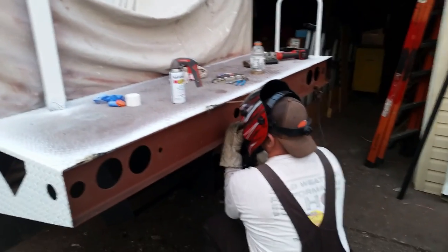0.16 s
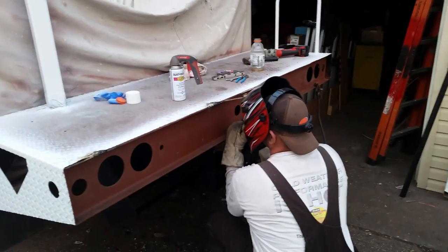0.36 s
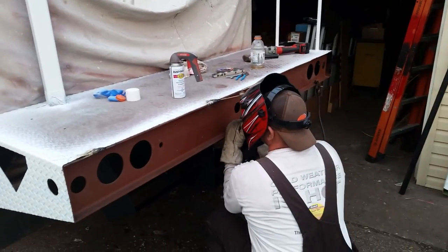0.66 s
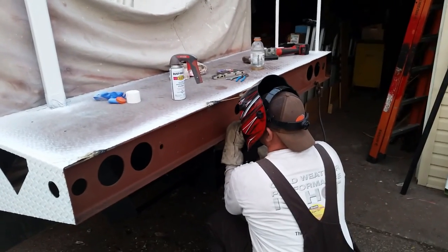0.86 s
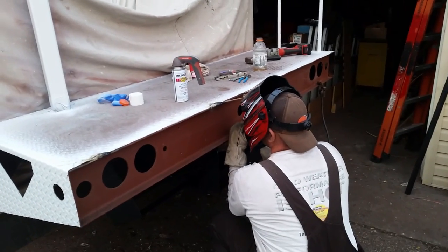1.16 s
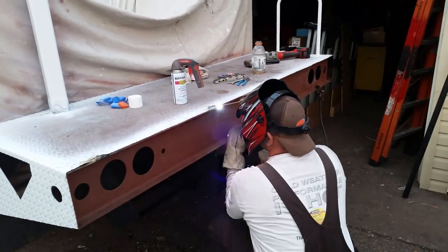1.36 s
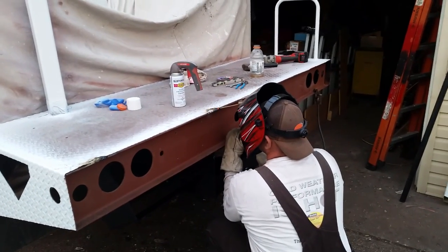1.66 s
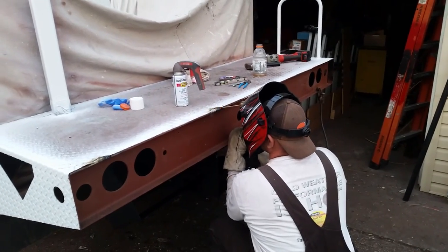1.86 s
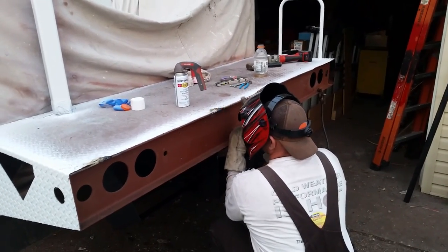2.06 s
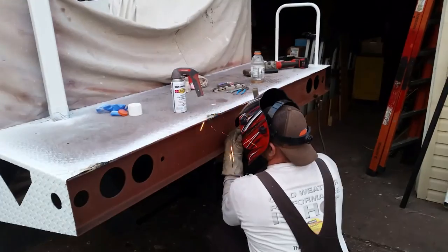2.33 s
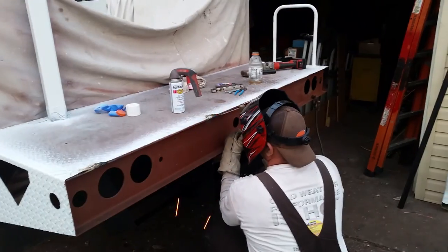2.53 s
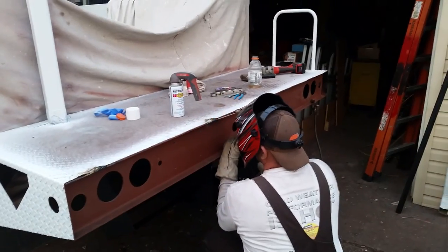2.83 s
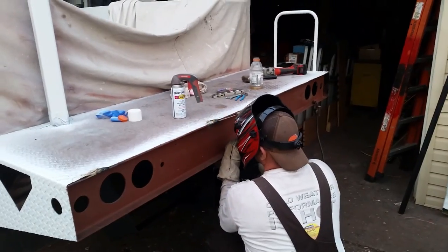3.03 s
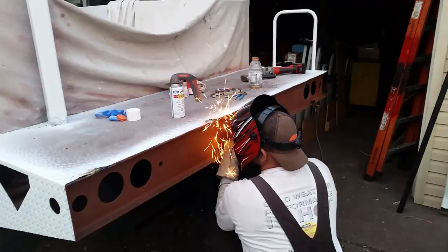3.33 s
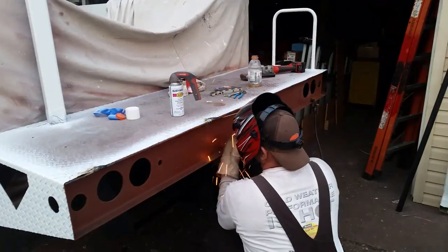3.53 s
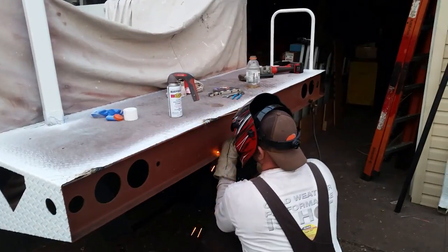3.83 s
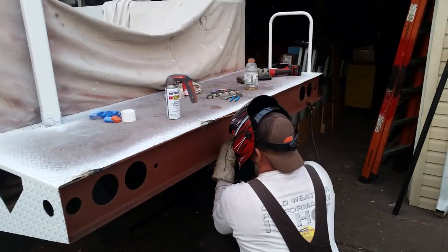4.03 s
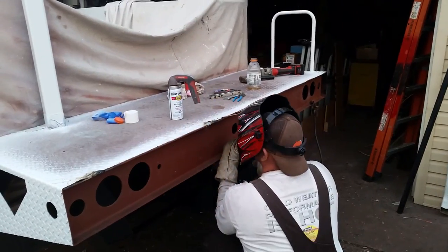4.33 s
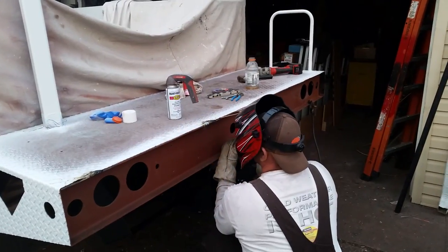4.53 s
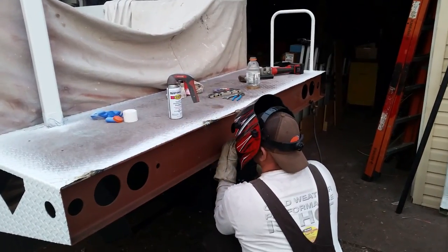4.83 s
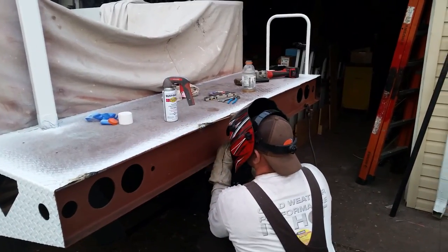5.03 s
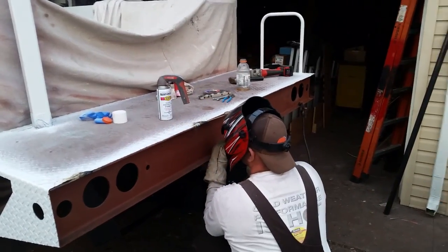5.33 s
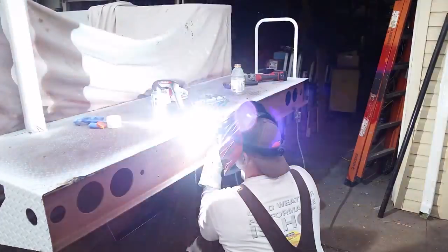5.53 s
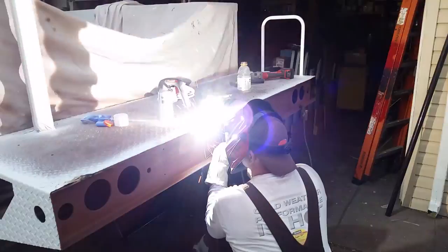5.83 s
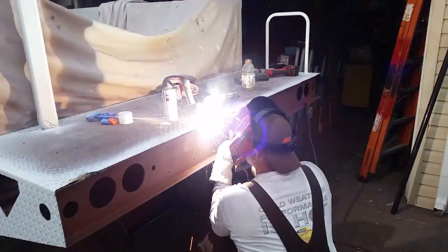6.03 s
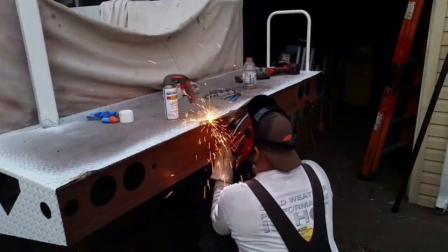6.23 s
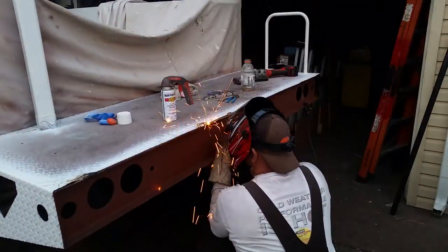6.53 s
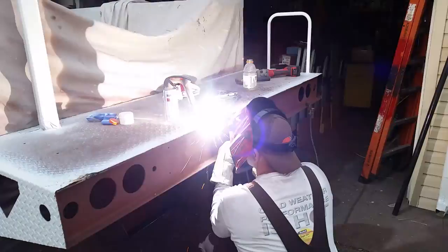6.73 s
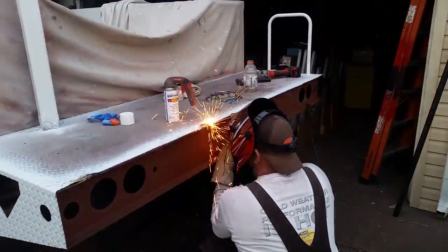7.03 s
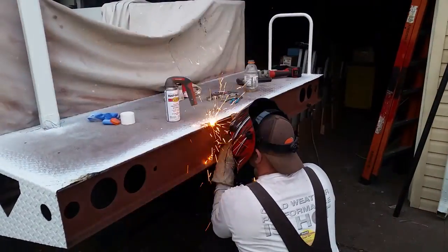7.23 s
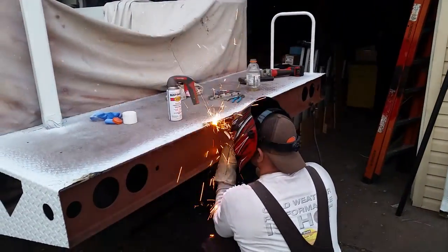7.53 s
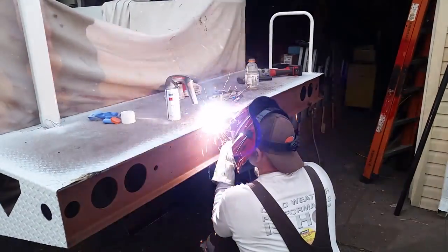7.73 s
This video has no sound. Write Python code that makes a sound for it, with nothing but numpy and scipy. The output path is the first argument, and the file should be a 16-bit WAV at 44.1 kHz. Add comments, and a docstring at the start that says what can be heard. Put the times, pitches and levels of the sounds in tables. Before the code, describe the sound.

Arc welding sputters and cracks on and off in a garage over the constant drone and rapid hiss of a small engine.

```python
"""A two-cylinder engine drones at about 3120 rpm; its exhaust spits a sharp hiss at every firing.
The block knocks, cooling air rushes. It drives a welder: stick welding on a truck frame in a garage.
At each of four burns the generator growls and speed sags; the governor opens the throttle and the
exhaust barks. Underneath, metal drops short the arc and sputter.
A few sharp cracks stand out over the engine."""
import sys
import numpy as np
from scipy import signal
from scipy.fft import rfft, irfft, next_fast_len
from scipy.io import wavfile
from scipy.ndimage import uniform_filter1d

SR = 44100
rng = np.random.default_rng(int(sys.argv[2]) if len(sys.argv) > 2 else 0)


def unload_audio(sound):
    """Save the sound as a 16-bit wav file, at the path given as the first command line argument."""
    columns = np.transpose(np.atleast_2d(sound))
    # keep every value between -1 and 1, then stretch to whole-number steps
    steps = np.round(np.clip(columns, -1, 1) * 32767)
    wavfile.write(sys.argv[1], SR, steps.astype(np.int16))


N = 347508
TIME_S = np.arange(N) / SR
IDLE_HZ = 26  # four-stroke cycles per second

# Table levels are relative; each source adds its own gain.
# engine speed: t/s, cycle rate/Hz
SPEED = [(0.0, 26.167), (1.04, 26.025), (1.43, 26.107), (1.82, 25.464), (2.24, 25.34), (2.7, 26.369),
         (2.93, 26.524), (3.33, 25.634), (3.52, 25.615), (4.12, 26.363), (4.61, 26.276), (4.98, 26.032),
         (5.5, 26.025), (5.93, 25.044), (6.35, 25.14), (6.75, 25.813), (7.15, 26.052), (7.88, 25.757)]
# drone lines: multiple of cycle rate, left level/dB, right level/dB
DRONE_ORDERS = [(2, -49.0, -47.1), (4, -43.3, -43.3), (5, -49.0, -51.3), (6, -34.4, -31.6),
                (7, -60.4, -54.2), (8, -47.9, -43.5), (9, -47.0, -47.8), (10, -33.5, -32.0),
                (11, -41.4, -39.6), (12, -42.8, -41.6), (13, -40.8, -38.9), (14, -48.0, -49.0),
                (15, -51.7, -50.6), (16, -39.0, -37.6), (17, -45.5, -47.4), (18, -45.8, -46.9),
                (19, -51.1, -45.2), (20, -48.5, -51.0), (22, -52.1, -52.9), (23, -41.7, -43.4),
                (24, -49.4, -46.5), (25, -36.6, -37.5), (26, -59.5, -51.9), (27, -43.7, -45.3),
                (28, -43.4, -41.6), (29, -39.5, -47.5), (30, -45.8, -49.2), (31, -47.1, -41.9),
                (32, -48.9, -50.1), (33, -44.6, -40.4), (34, -50.8, -46.0), (35, -42.2, -39.8),
                (37, -44.7, -44.6), (43, -46.6, -45.6), (52, -44.7, -51.9), (64, -45.2, -57.2)]
# block knocks: position/cycles, level/dB
KNOCKS = [(.195, 1), (.27, -7), (.325, -8), (.705, 0), (.87, -12)]
# later arrival on the left: f/Hz, lag/rad
LEFT_LAG = [(0, 0), (100, .4), (480, .6), (580, 1.15), (760, .8), (860, 1.7), (930, 2.1), (1300, 2.2),
            (1750, 3.1), (2050, 5.5), (2500, 6.5)]
# blow-down, then piston push, per cylinder: start/cycles, rise/cycles, length/cycles,
# stretch/(cycles per throttle dB), level/dB, extra level/(dB per throttle dB)
PUFFS = [(.4, .05, .155, .007, 1.5, -.1), (.615, .035, .085, 0, -2, -1.6), (.887, .025, .07, .011, 0, .2),
         (1.03, .06, .095, 0, -2, -1.3)]
# slow drift of the hiss: t/s, level/dB
HISS_DRIFT = [(0, -3), (.5, 0.3), (1.0, -1.2), (1.4, 0.5), (5.6, 1.6), (6.45, -0.8), (7.88, 1.6)]
# arc burns: strike t/s, break t/s, current/(0-1)
BURNS = [(1.482, 2.216, 1), (3.097, 3.38, 0.57), (5.5, 5.82, 0.8), (6.35, 7.95, 1)]
# blow-down under load, per cylinder: start/cycles, rise/cycles, length/cycles, level/dB
BARKS = [(.405, .085, .155, 1.2), (.892, .025, .1, -.5)]
# sharp cracks: t/s, level/dB
CRACKS = [(2.336, -20), (2.3735, -19), (2.431, -24), (3.5275, -23), (3.7595, -26), (4.0272, -23),
          (5.4793, -23), (5.828, -23), (5.8697, -20), (6.3849, -28), (6.7386, -21), (6.8167, -15.5),
          (7.1272, -18.5), (7.4714, -22), (7.7423, -29)]
# noise density per source: f/Hz, left level/dB, right level/dB
HISS_SPECTRUM = [(5470, -80.5, -84.5), (6540, -91, -70), (7780, -79, -89), (8440, -74.5, -104),
                 (9380, -60.5, -104), (9910, -52, -93), (10720, -50.5, -81), (11060, -55.5, -75),
                 (11730, -54, -76), (12760, -58.5, -92), (13600, -60, -90), (14300, -58, -86)]
BLOCK_SPECTRUM = [(610, -80, -81), (920, -74.5, -70.5), (1355, -65.5, -66), (1795, -67, -76),
                  (2080, -89, -76.5), (2390, -73.5, -79.5), (3000, -116, -79.5), (7000, -100, -95)]
FAN_SPECTRUM = [(30, -97, -97), (70, -87, -81), (133, -65.5, -70.5), (310, -66, -70), (503, -60, -56),
                (592, -61, -73), (784, -69, -68), (1020, -63, -61.5), (1300, -69.5, -80.5),
                (1900, -66.5, -78.5), (2450, -64, -68.5), (3060, -76, -73.5), (3950, -69.5, -69.5),
                (6570, -91, -72), (9000, -103, -84.5)]
ARC_SPECTRUM = [(500, -69, -87), (1500, -95, -109), (4000, -82.5, -94), (7540, -102, -100.5),
                (11300, -62.5, -94), (16000, -77, -88)]
BARK_SPECTRUM = [(600, -77, -69), (960, -65, -76), (1400, -68, -79), (2190, -64, -74), (2960, -66, -75),
                 (3600, -73, -64.5), (5000, -66.5, -71.5), (6300, -80, -65), (7740, -79, -74),
                 (9400, -61, -85), (11200, -57.5, -71.5), (15700, -58, -74)]
CRACK_SPECTRUM = [(500, -83, -79), (1300, -54.5, -65), (2300, -55.5, -66), (4000, -58.5, -68),
                  (6500, -67, -68), (8150, -71, -78), (10900, -41, -78), (16000, -60, -80)]


def gain(db):
    """dB to amplitude."""
    return 10 ** (np.asarray(db) / 20)


def unit_rms(x):
    """Scale to rms 1."""
    return x / np.sqrt(np.mean(x ** 2) + 1e-20)


def curve(table):
    """Breakpoints to one value per sample."""
    return np.interp(TIME_S, *np.transpose(table))


def wander(rate_hz):
    """Random drift, rms about 1."""
    knots = rng.standard_normal(N // 8)
    return np.interp(TIME_S * rate_hz, np.arange(len(knots)), knots) * np.sqrt(3 / 2)


def lag_rad(hz):
    """Phase lag, left and right; right is zero."""
    return np.array([[1], [0]]) * np.interp(hz, *np.transpose(LEFT_LAG))


def coloured(white, spectrum):
    """Apply a stereo spectrum and the left lag."""
    knots_hz, *sides_db = np.transpose(spectrum)
    size = next_fast_len(N)
    hz = np.fft.rfftfreq(size, 1 / SR)
    db = np.array([np.interp(np.log(hz + 1), np.log(knots_hz), side) for side in sides_db])
    response = gain(db) * np.exp(-1j * lag_rad(hz))
    return irfft(rfft(white, size) * response, size)[:, :N] * np.sqrt(SR / 2)


def governor_db(lag_s=0.44, db_per_hz=7.5, idle_db=1.05):
    """Throttle gas flow: rises, with a lag, as speed sags."""
    sag_hz = IDLE_HZ - curve(SPEED)
    pole = np.exp(-1 / (lag_s * SR))
    return idle_db + db_per_hz * signal.lfilter([1 - pole], [1, -pole], sag_hz)


def weld_current(rise_s=0.15, fall_s=0.25):
    """Current, 0-1: each burn rises, holds, dies away."""
    return sum(peak * np.clip((TIME_S - strike_s) / rise_s, 0, 1)
               * np.clip(1 - (TIME_S - break_s) / fall_s, 0, 1) for strike_s, break_s, peak in BURNS)


def drone(cycles, scatter=0.74, waver=0.093, bright_db_per_hz=3.0, level_db=0.22):
    """Engine orders, phased by the knocks, partly scattered by the garage walls."""
    throttle_db = governor_db()
    overspeed_hz = curve(SPEED) - IDLE_HZ
    exhaust_boom_db = -0.2 + 1.22 * throttle_db
    muffler_note_db = 2.5 * overspeed_hz
    generator_growl_db = 0.5 + 0.32 * throttle_db + 20 * np.log10(1 + 1.4 * weld_current())
    casing_hum_db = 0.5 - 0.59 * throttle_db
    order_db = {4: exhaust_boom_db, 6: muffler_note_db, 8: generator_growl_db, 10: casing_hum_db}
    out = np.zeros((2, N))
    for order, left_db, right_db in DRONE_ORDERS:
        direct = sum(gain(db) * np.exp(-2j * np.pi * order * position) for position, db in KNOCKS)
        clarity = min(order / 21, 1) ** 2  # garage blurs the bass most
        reflected = scatter * (rng.standard_normal() + 1j * rng.standard_normal())
        offset_rad = np.angle(clarity * direct + reflected)
        bright_db = np.clip((order - 16) / 8, 0, 1) * bright_db_per_hz * overspeed_hz
        unsteady = waver * order / 20
        level = gain(order_db.get(order, bright_db)) * (1 + unsteady * wander(14))
        phase_rad = 2 * np.pi * (order * cycles % 1) + offset_rad + unsteady * wander(14)
        out += gain([[left_db], [right_db]]) * level * np.cos(phase_rad - lag_rad(order * IDLE_HZ))
    return gain(level_db) * np.sqrt(2) * out


def valve_flow(cycles, start, rise, length, uneven_db=0.8, jitter_cycles=0.004):
    """One puff per cycle: quick opening, hold, long fall; size and timing scatter."""
    firing = np.floor(cycles - start + jitter_cycles * 2).astype(int)
    size, late = rng.standard_normal((256, 2))[firing].T
    age_cycles = np.maximum(cycles - start - firing - jitter_cycles * late, 0)
    opening = 1 - np.exp(-age_cycles / rise)
    return gain(uneven_db * size) * opening / np.sqrt(1 + (age_cycles / length) ** 5)


def exhaust_hiss(cycles, wash_db=-12, grain_db=1.73, snap_db_per_db=5.0):
    """Turbulent jets at each firing, sharper and longer under load; garage wash between them."""
    throttle_db = governor_db()
    snap = gain(snap_db_per_db * throttle_db)
    power = gain(wash_db) ** 2
    for start, rise, length, stretch, db, extra in PUFFS:
        puff = valve_flow(cycles, start, rise / snap, length + stretch * throttle_db)
        power += (gain(db + extra * throttle_db) * puff) ** 2
    flow = np.sqrt(power / uniform_filter1d(power, size=8192))
    jet = unit_rms(flow * gain(grain_db * wander(1300)) * rng.standard_normal((2, N)))
    return gain(throttle_db + curve(HISS_DRIFT)) * coloured(jet, HISS_SPECTRUM)


def block_knocks(cycles, ring_s=0.0024, level_db=2, load_db_per_db=-0.34):
    """Each knock rings the casing its own way, every cycle; load takes up slack and softens it."""
    knocks = np.zeros(N)
    for position, db in KNOCKS:
        hits = np.diff(np.floor(cycles - position), prepend=np.floor(cycles[0] - position))
        ring = rng.standard_normal(1024) * np.exp(-TIME_S[:1024] / ring_s)
        knocks += signal.oaconvolve(hits * gain(db), ring)[:N]
    return gain(level_db + load_db_per_db * governor_db()) * coloured(unit_rms(knocks), BLOCK_SPECTRUM)


def fan(flutter_db=1.0, level_db=-1.5, split_hz=1100):
    """Cooling air and blurred clatter fill the garage; both sides share the bass."""
    low_pass = signal.butter(2, split_hz, fs=SR, output="sos")
    high_pass = signal.butter(2, split_hz, "high", fs=SR, output="sos")
    bass = signal.sosfilt(low_pass, rng.standard_normal(N))
    treble = signal.sosfilt(high_pass, rng.standard_normal((2, N)))
    return gain(level_db + flutter_db * wander(120)) * coloured(bass + treble, FAN_SPECTRUM)


def arc_sputter(drops_per_s=150, spread_db=5, ring_s=0.0022):
    """Metal drops short the arc and snap; rate follows current."""
    shorts = rng.random(N) < weld_current() * drops_per_s / SR
    snaps = shorts * gain(spread_db * np.minimum(rng.exponential(1, N), 2))
    ring = rng.standard_normal((2, 1024)) * np.exp(-TIME_S[:1024] / ring_s)
    sputter = signal.oaconvolve(snaps[None], ring, axes=1)[:, :N]
    return coloured(unit_rms(sputter), ARC_SPECTRUM)


def exhaust_bark(cycles, grain_db=2.5, level_db=-10, load_db_per_db=2.11):
    """As the throttle opens, each blow-down fills the midrange too."""
    flow = sum(gain(db) * valve_flow(cycles, start, rise, length) for start, rise, length, db in BARKS)
    jet = unit_rms(flow * gain(grain_db * wander(1300)) * rng.standard_normal((2, N)))
    return gain(level_db + load_db_per_db * governor_db()) * coloured(jet, BARK_SPECTRUM)


def sharp_cracks(decay_s=0.0028, level_db=25):
    """Short hard bursts over the engine, reaching down into the midrange."""
    impulses = np.zeros(N)
    for t_s, db in CRACKS:
        impulses[round(t_s * SR)] = gain(db + level_db)
    envelope = signal.lfilter([1], [1, -np.exp(-1 / (decay_s * SR))], impulses + 1e-12)
    return coloured(envelope * rng.standard_normal((2, N)), CRACK_SPECTRUM)


def scene():
    """Engine, arc, cracks; one crankshaft times drone, exhaust and knocks."""
    cycles = np.cumsum(curve(SPEED)) / SR
    engine = drone(cycles) + exhaust_hiss(cycles) + block_knocks(cycles) + fan()
    return engine + arc_sputter() + exhaust_bark(cycles) + sharp_cracks()


def record(dry, cutoff_hz=15850):
    """Clip at full scale, then low-pass."""
    low_pass = signal.firwin(1023, cutoff_hz, window=("kaiser", 9), fs=SR)
    return signal.oaconvolve(np.clip(dry, -1, 1), low_pass[None], "same")


dry = scene()
out = record(dry)
unload_audio(out)
```